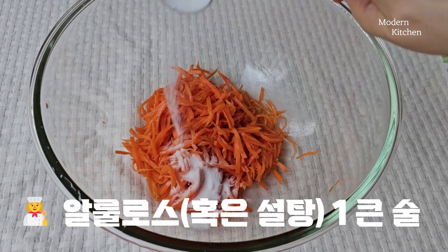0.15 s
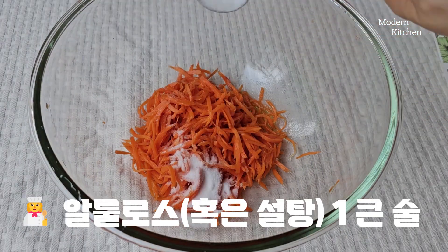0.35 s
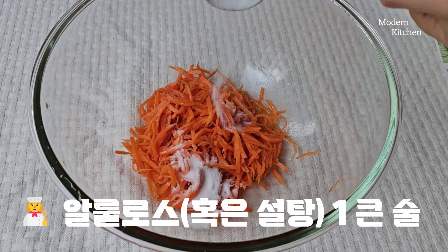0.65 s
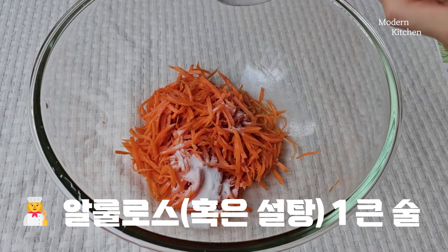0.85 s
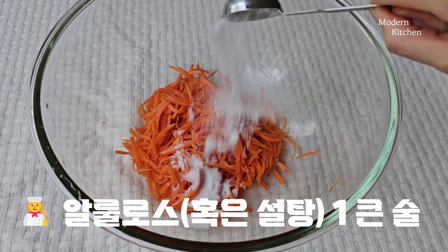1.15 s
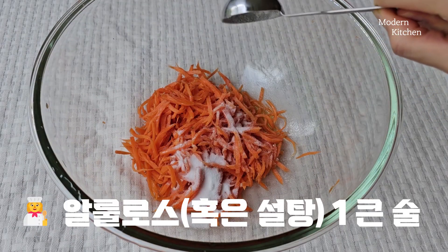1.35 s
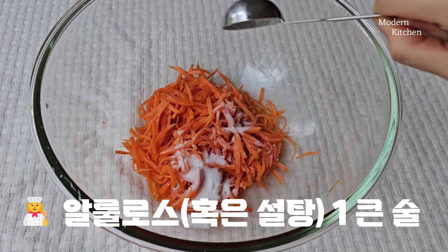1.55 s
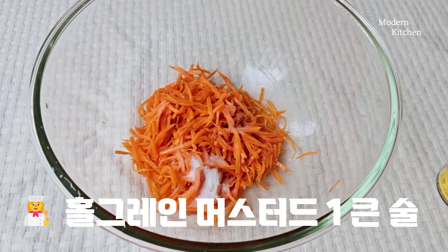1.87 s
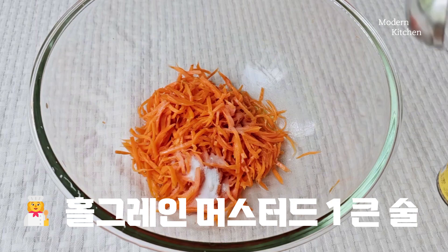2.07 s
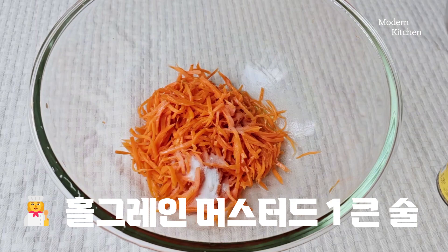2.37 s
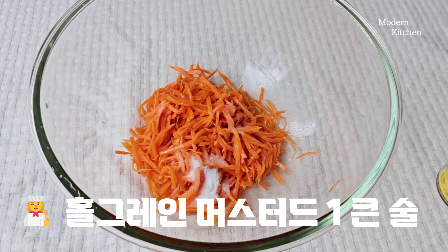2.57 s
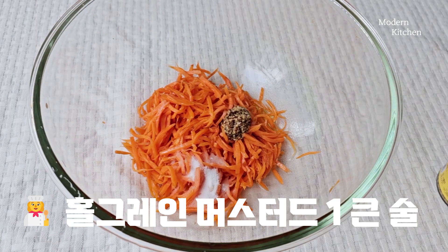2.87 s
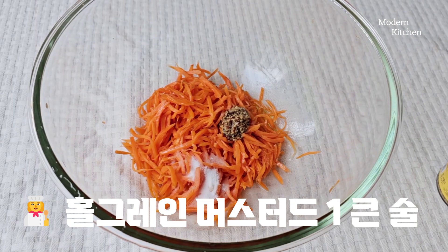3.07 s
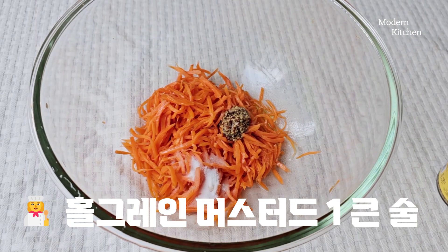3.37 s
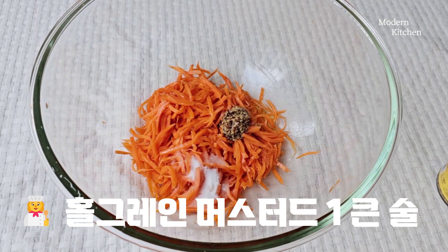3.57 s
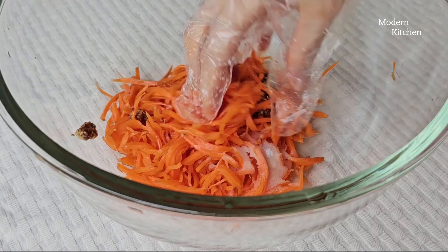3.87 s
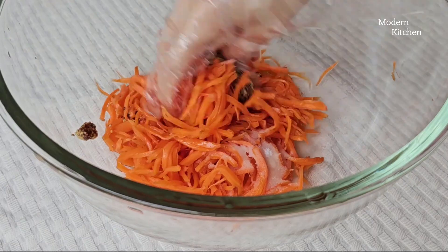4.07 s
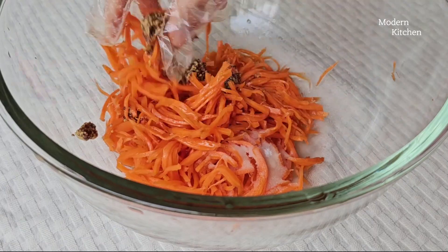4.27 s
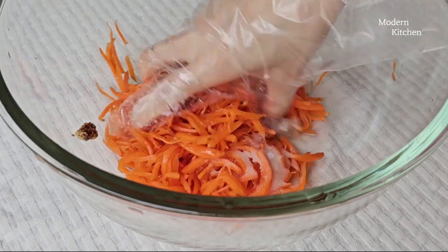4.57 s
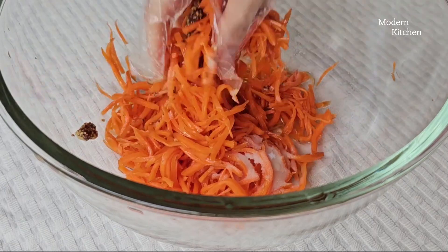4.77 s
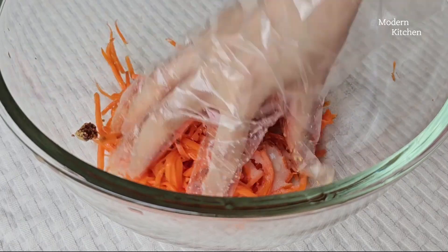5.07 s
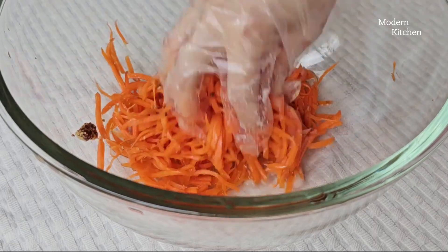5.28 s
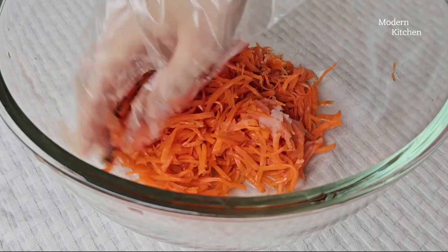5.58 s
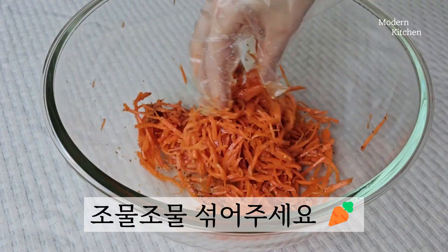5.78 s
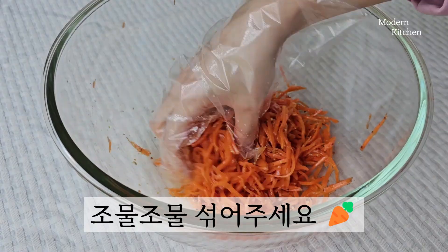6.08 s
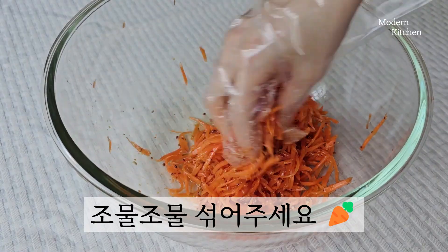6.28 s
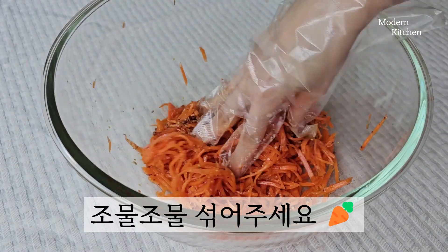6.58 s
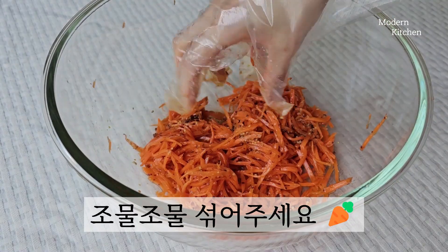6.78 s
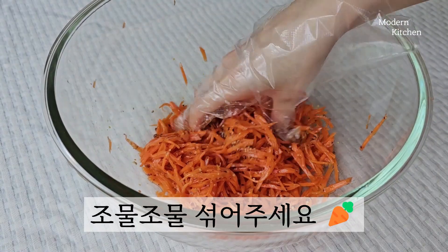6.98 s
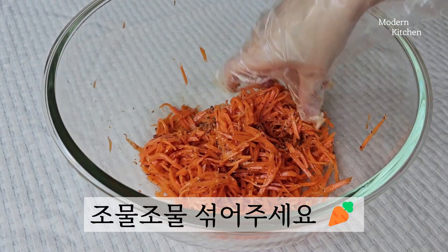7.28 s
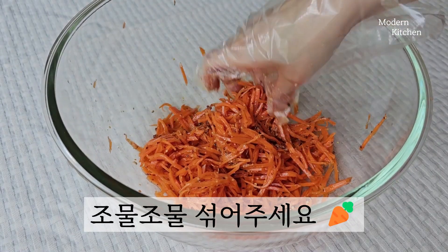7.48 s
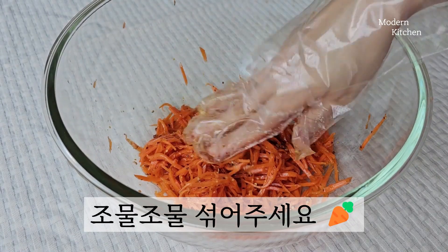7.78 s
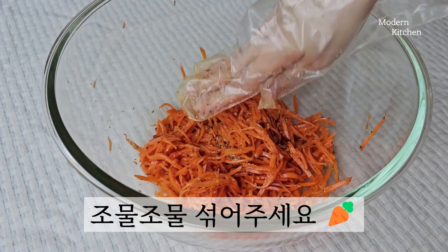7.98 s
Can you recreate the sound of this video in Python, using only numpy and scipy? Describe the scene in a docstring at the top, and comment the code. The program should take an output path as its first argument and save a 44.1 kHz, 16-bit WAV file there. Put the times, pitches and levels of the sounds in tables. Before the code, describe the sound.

A quiet kitchen, closely miked in stereo, with faint low hum, table rumble and soft hiss. At about 1.0 to 1.3 s fingers lightly tap a steel measuring spoon, small dry clicks with a trace of rattling sugar; fainter ones follow to 1.7 s. The level dips briefly near 1.8 s. Another spoon gives thin bright ticks at 2.15 and 2.3 s, and a weaker one at 2.7 s. A lump of mustard lands very softly at 3.0 s, then a loud, sharp clink rings high at 3.4 s. After a tiny gap near 3.8 s, a hand in thin plastic film squeezes carrot shreds in a glass bowl until 8.1 s: dense, bright crackle in irregular surges, strongest snaps around 4.0 s, moist low squelch underneath, and dull bumps and table booms, notably at 4.55, 5.2 and 6.95 s. The sound leans slightly left, with little room reverberation.

```python
"""Faint hum and hiss come first, then finger taps on a steel measuring spoon; a second spoon ticks on a jar
and drops mustard. A hand in a thin plastic glove then squeezes shredded carrot in a glass bowl.
Film and wet shreds are crowds of short wavelets, the mustard spoon is a sum of decaying modes, taps are
noise through the spoon's resonances, and the table boom is low noise that swells with pressure.
The whole level dips briefly near 1.8 s and 3.8 s."""
import sys
import numpy as np
from scipy import signal
from scipy.fft import rfft, irfft, next_fast_len
from scipy.io import wavfile
from scipy.ndimage import uniform_filter1d, map_coordinates

SR = 44100
rng = np.random.default_rng(int(sys.argv[2]) if len(sys.argv) > 2 else 0)


def transcribe(signal):
    """Save signal, clipped to [-1, 1], as a 16-bit WAV file at the path in sys.argv[1]."""
    frames = np.atleast_2d(signal).T
    limited = np.clip(frames, -1, 1)
    pcm = np.round(limited * 32767).astype(np.int16)
    wavfile.write(sys.argv[1], SR, pcm)


N = 358974

# Squeezing hand: t/s, crackle level/dB, squelch over crackle/dB, treble over crackle/dB
SQUEEZES = [(3.8, -52.5, -7, -10), (3.82, -53, -12.5, -7), (3.9, -54.5, -3, -9), (3.93, -47, -12, -6),
            (4.13, -40, -9.5, -6), (4.31, -55, -11.5, -9), (4.42, -52, -10.5, -4), (4.44, -42, -19, -6),
            (4.56, -49, -4, -7.5), (4.58, -43, -14, -4), (4.65, -48.5, -15.5, -6), (4.67, -39.5, -12, -7),
            (4.72, -46.5, -10.5, -5.5), (5.01, -56, -14, -7), (5.02, -48.5, -15, -5.5),
            (5.21, -46, -8.5, -5.5), (5.24, -42, -13.5, -6), (5.37, -53, -13, -4), (5.39, -48, -11, -5),
            (5.53, -52, -16, -5), (5.54, -56.5, -10, -9), (5.59, -41, -19, -12), (5.62, -46.5, -12, -13),
            (5.65, -41, -13.5, -6.5), (5.87, -62, -12, -6.5), (5.94, -51.5, -13, -5), (5.96, -40, -18, -6),
            (5.98, -48, -17, -12), (6.13, -50.5, -10, -10.5), (6.17, -47, -10.5, -3),
            (6.28, -54, -12.5, -5.5), (6.45, -50.5, -11.5, -8), (6.58, -44.5, -14.5, -4.5),
            (6.66, -60.5, -11, -8), (6.7, -48, -16, -5), (6.75, -53, -10.5, -7.5), (6.87, -46.5, -11, -5.5),
            (6.91, -59, -5, -10), (6.94, -40.5, -14, -6.5), (7.04, -46, -10.5, -7), (7.29, -56, -12, -4.5),
            (7.35, -43, -14.5, -8), (7.37, -53, -13, -7), (7.41, -45, -13.5, -5), (7.47, -55.5, -14.5, -9),
            (7.68, -60.5, -10, -6), (7.76, -47, -11.5, -9), (7.8, -52, -8, -11), (7.82, -43, -19, -8),
            (7.84, -42.5, -8, -7), (7.95, -53.5, -9, -9), (7.96, -47, -16.5, -5), (8.04, -65, -6, -9),
            (8.14, -56, -9.5, -8)]
# Loudest film buckles: t/s of the first give, peak level/dB, f/Hz
LOUD_SNAPS = [(3.8219, -35.5, 8350), (3.9077, -36, 4600), (3.9276, -33, 5440), (3.9416, -30, 3700),
              (3.9564, -24.5, 5570), (3.992, -29, 7380), (4.0414, -25.5, 7500), (4.1885, -32, 7260),
              (4.2783, -31, 8170), (4.386, -37, 7290), (4.433, -35, 5490), (4.439, -32, 7290),
              (4.4716, -35, 4450), (4.5407, -35, 7530), (4.5737, -30, 8770), (4.656, -32, 6200),
              (4.6662, -29, 7450), (4.7296, -33, 7240), (4.756, -34, 4800), (4.8979, -31.5, 7150),
              (4.9204, -45, 3570), (4.9348, -36, 6470), (5.0171, -34, 8800), (5.2391, -29, 7090),
              (5.282, -29, 7500), (5.3364, -29, 13700), (5.5025, -31.5, 8210), (5.5619, -34, 4270),
              (5.5799, -26, 5150), (5.6697, -30, 7330), (5.7227, -32, 4760), (5.7799, -35, 8800),
              (5.9041, -34.5, 7350), (5.9313, -31, 7800), (5.9605, -27, 7100), (5.9926, -35, 2750),
              (6.0762, -33.5, 7560), (6.1715, -32.5, 7600), (6.2374, -35, 7080), (6.2997, -34, 11000),
              (6.395, -30.5, 5450), (6.4344, -38, 6160), (6.4755, -29.5, 7670), (6.5083, -31, 8200),
              (6.5287, -34, 7310), (6.6898, -38, 7280), (6.702, -33, 4750), (6.7223, -31, 7670),
              (6.7786, -32.5, 7410), (6.8195, -30.5, 7120), (6.922, -31, 5430), (6.938, -27, 4470),
              (7.022, -33, 7040), (7.113, -34, 6580), (7.1264, -32, 7330), (7.2166, -33, 13200),
              (7.3473, -27, 7360), (7.3878, -31, 5500), (7.4135, -27.5, 7090), (7.5614, -38.5, 2600),
              (7.5776, -32.5, 7700), (7.6277, -35, 8930), (7.7516, -31, 4430), (7.8183, -31, 6600),
              (7.956, -31, 5360), (8.1176, -39, 4450)]
# Spectrum of the film: f/Hz, density level/dB
FILM_SPECTRUM = [(710, -25), (1200, -11.5), (2150, -9.5), (2600, -4), (4430, -0.5), (6300, -2), (7350, 0.5),
                 (10000, -5.5), (11500, -3.5), (14500, -8.5), (16000, -8.5)]
# Spectrum of the wet shreds: f/Hz, density level/dB
SHRED_SPECTRUM = [(150, -15), (300, -11.5), (700, -21.5), (1500, -7), (2500, -16), (5000, -17)]
# Air and glass resonances of the bowl: f/Hz, width/Hz, level/dB
BOWL_MODES = [(595, 116, 4.5), (1039, 87, 10), (2163, 176, -5)]
# Shadow of the microphone body: f/Hz, left-right level/dB
BODY_SHADOW = [(300, -4), (700, 0), (1500, -1.5), (5000, 2.5), (15000, 0)]
# Mustard spoon on steel or glass: t/s, peak level/dB, left-right level/dB, ring level/dB,
# brightness/(dB per octave), crack t60/s
SPOON_TICKS = [(2.146, -32.5, 4, -45, 9.5, 0.019), (2.2796, -35.5, 2.5, -48, 8, 0.029),
               (2.715, -43, 12, -38, 23, 0.0064), (3.3746, -19.5, 1.5, -21.5, 2.5, 0.032)]
# Modes of the mustard spoon: f/Hz, level/dB, t60/s, swell/s
SPOON_MODES = [(1600, -15, .09, .001), (2552, -11, .45, .03), (4285, -19, .38, .002), (6207, -17, .1, .001),
               (7197, -13, .1, .001), (8759, -10, .4, .002), (10830, -16, .15, .001), (12550, 3, .24, .002),
               (14450, -14, .15, .001)]
# Finger taps on the sugar spoon: t/s, peak level/dB, left-right level/dB
FINGER_TAPS = [(1.0081, -52, 4), (1.0997, -36.5, 0), (1.2037, -39.5, 2), (1.3029, -54, 7), (1.51, -63, 9),
               (1.6132, -58, 10), (1.726, -57.5, 3.5)]
# Resonances of the sugar spoon's cup: f/Hz, width/Hz, level/dB
CUP_MODES = [(5170, 820, -11), (6400, 410, 6.5), (8700, 1300, -11), (11800, 2400, -14), (15000, 1900, -19)]
# Mustard or hand bumping the bowl: t/s, peak level/dB, f/Hz, t60/s, knock level/dB
BOWL_BUMPS = [(2.99, -54.5, 58, 0.3, -22), (4.1, -56, 279, 0.12, -12), (4.552, -46, 54, 0.11, -12),
              (5.158, -37, 195, 0.1, -4), (5.598, -54, 93, 0.16, -5), (5.963, -51.5, 83, 0.14, -1.5),
              (6.94, -44, 93.7, 0.22, 0)]
# Lump of mustard landing on the shreds: t/s of the peak, level/dB, rise/s and fall/s for 20 dB
MUSTARD_PLOP = (3, -61.5, 0.04, 0.07)
# Spectrum of the landing: f/Hz, density level/dB
PLOP_SPECTRUM = [(410, -57), (700, -34), (1090, 0), (1550, -17), (2480, -9), (3720, -12), (7130, -4.5),
                 (11300, -7), (15800, -16)]
# Handling of spoons and sliding sugar: t/s of the peak, dull level/dB, bright level/dB,
# rise/s and fall/s for 20 dB
HANDLING = [(1.01, -79, -92, .05, 0.4), (1.13, -83, -73, .06, 0.16), (1.31, -80.5, -71, 0.056, 0.1),
            (1.62, -80, -88, 0.11, 0.07), (1.7, -82, -83, 0.091, .12), (1.86, -85, -69.5, 0.19, 0.1),
            (2.05, -92, -68, 0.085, 0.08), (2.1, -86, -75, .04, .04), (2.17, -70.5, -62, 0.033, 0.1),
            (2.295, -71.5, -68, 0.027, 0.08), (2.41, -80, -78, .08, 0.3), (3.29, -77, -73, 0.077, .2),
            (3.35, -78, -76, .05, 0.15), (3.385, -54, -53, .012, 0.09), (3.72, -75, -75, .06, .14)]
# Resonances that colour the rubbing: f/Hz, width/Hz, level/dB
RUB_MODES = [(4400, 230, -12.5), (6400, 820, -10.5), (8750, 190, -4), (10020, 190, -6), (11500, 510, -10),
             (14500, 950, -10.5)]
# Hand leaning on the bowl: t/s of the peak, boom level/dB
LEANS = [(4.05, -61), (4.57, -50), (4.69, -54.5), (4.93, -60), (5.18, -49), (5.61, -62), (6.0, -61),
         (6.12, -56), (6.5, -63), (6.63, -65), (6.97, -51), (7.64, -69)]
# Boom of the table at rest: t/s, level/dB
TABLE_LEVEL = [(0, -69.5), (1.4, -71), (2.16, -77), (3.7, -74.5), (3.85, -66.5), (6.2, -68), (8.14, -73)]
# Spectrum of the table boom: f/Hz, density level/dB
TABLE_SPECTRUM = [(25, -11), (45, -9.5), (60, 3.5), (85, -7), (120, -10.5), (200, -42.5)]
# Deepest rumble: t/s, level/dB
DEEP_LEVEL = [(0, -69), (1.7, -67.5), (2.2, -84), (2.8, -82), (3.04, -69), (3.3, -82), (3.85, -72),
              (6.0, -77), (7.15, -71), (8.14, -75)]
# Spectrum of the deepest rumble: f/Hz, density level/dB
DEEP_SPECTRUM = [(10, -15), (22, 1), (40, 9), (60, -13), (90, -47.5)]
# Spectrum of the room hum: f/Hz, density level/dB
HUM_SPECTRUM = [(53, -24), (90, -3.5), (103, -13.5), (140, -14), (236, -4.5), (327, -11.5), (364, -6.5),
                (429, -17.5), (551, -15), (900, -26.5), (1170, -48), (1980, -120)]
# Room hum: t/s, level/dB
HUM_LEVEL = [(0, -75), (3.26, -78), (3.9, -74.5), (6.9, -72), (8.14, -76.5)]
# Spectrum of the hiss: f/Hz, density level/dB
HISS_SPECTRUM = [(410, -46), (700, -12), (983, -6.5), (1420, -6.5), (1860, -9.5), (2120, -1), (2420, -16.5),
                 (2860, -0.5), (3570, -3.5), (5940, -13), (7810, -12), (9380, -34), (11600, -10.5),
                 (15800, -14.5)]
# Hiss: t/s, level/dB
HISS_LEVEL = [(0, -74.5), (.4, -78), (1.7, -77), (2.6, -79.5), (8.14, -75)]
# Left-right likeness of hum and hiss: f/Hz, correlation (-1 to 1)
LIKENESS = [(60, 0.94), (180, 0.67), (550, 0.17), (1650, -0.16), (4970, -0.12), (15000, 0.52)]
# Reverberation of the kitchen: f/Hz, t60/s
REVERBERATION = [(300, 0.27), (3000, 0.58), (14000, 0.1)]
# Brief level dips: t/s of fall start, lowest from, lowest to and full return, lowest level/dB
LEVEL_DIPS = [(1.762, 1.776, 1.796, 1.803, -20), (3.764, 3.774, 3.796, 3.799, -60)]

TOP_HZ = 15900  # band limit
# left-right level of the film, its usual tilt, tilt per dB of extra treble, crackle at a firm squeeze
HAND_PAN_DB, DULL_DB, BRIGHTENS, FIRM_DB = 3.3, -0.7, 0.66, -47
# time for 20 dB; share in the deepest rumble
PRESS_RISE_S, PRESS_FALL_S, PRESS_DEEP_DB = 0.054, 0.083, -20
BUCKLE_S = .0012  # from the first give to the peak
# lesser buckles: level at a firm squeeze, dB per dB of crackle, middle pitch
LESSER_DB, LESSER_GROWS, LESSER_HZ = -38.5, 0.66, 7000
# snaps lie left; between squeezes the fine crackle sinks faster than the snaps
SNAP_PAN_DB, LULLS_DEEPEN = 5, 0.078


def glove():
    """Buckling instability: folds of film snap in clumps, as a crowd of clicks, a finer hiss and loud snaps."""
    crackle_db, _, treble_db = curves(SQUEEZES)
    squeezing = during(SQUEEZES)
    bright = DULL_DB + BRIGHTENS * (treble_db - treble_db[squeezing].mean())
    crowd = swarm(790, 20200, tail_db=3.5, cycles=0.44, count=17000, size=64)
    crowd = scatter(crowd * amp(2.8 * wobble(70)), t60=0.013, db=0)
    crowd = filtered(crowd, lambda hz: amp(along(FILM_SPECTRUM, hz)))
    crowd = crowd / np.sqrt(np.mean(crowd[:, squeezing] ** 2))
    fine_hiss = rush(FILM_SPECTRUM, [(1000, 0.39), (12000, 0.99)]) * squeezing
    bed = patchy(amp(0.07) * crowd + amp(-6.5) * fine_hiss, db=2.0)
    bed = tilted(bed, bright, hz=6540)

    s, db, hz = buckles(crackle_db, count=130)
    pan = SNAP_PAN_DB + 4 * rng.standard_normal(len(s))
    lead = 0.00014 + .8e-4 * rng.standard_normal(len(s))
    s = s + BUCKLE_S
    snaps = grains(s, hz, amp(db - 4.5), 0.69, pan, lead, size=128)
    # the broad edge of the buckle
    snaps += grains(s, 0 * s + 11000, amp(db - 1.0), 0.43, pan, lead, size=32)

    fine_db = crackle_db + LULLS_DEEPEN * np.minimum(crackle_db - FIRM_DB, 0)
    fine = amp(fine_db) * sides(HAND_PAN_DB)[:, None] * bed
    return fine + scatter(snaps, t60=0.014, db=3)


def buckles(crackle_db, count):
    """Stochastic events: the listed snaps, plus lesser ones at random times whose level grows with the crackle."""
    g = rng.standard_normal((count, 2))
    s = rng.uniform(SQUEEZES[0][0], SQUEEZES[-1][0] - .02, count)
    extra_db = crackle_db[(s * SR).astype(int)] - FIRM_DB
    db = LESSER_DB + LESSER_GROWS * extra_db + 3.6 * g[:, 0]
    hz = np.clip(LESSER_HZ * np.exp(.4 * g[:, 1]), 2500, 15000)
    return np.hstack([np.transpose(LOUD_SNAPS), [s, db, hz]])


def carrot():
    """Resonant colouring: the squelch of wet shreds is a crowd of low grains filtered by the bowl's modes."""
    squelch_db = sum(curves(SQUEEZES)[:2])
    wet = swarm(202, 4160, tail_db=2.5, cycles=0.44, count=9000, size=160)
    wet = wet * amp(1.55 * wobble(35))
    bowl = resonant(BOWL_MODES)
    wet = filtered(wet, lambda hz: amp(along(SHRED_SPECTRUM, hz) + 9) * (0.41 + bowl(hz)))
    wet = scatter(wet, t60=0.081, db=-8.5)
    wet = wet / np.sqrt(np.mean(wet[:, during(SQUEEZES)] ** 2))
    return amp(squelch_db + 4.5) * sides(3.4)[:, None] * wet


def mustard_spoon():
    """Modal vibration: a bright noise crack and the spoon's decaying modes, with levels differing by port."""
    out, t = np.zeros((2, N + SR)), np.arange(SR * 2 // 5) / SR
    f = np.fft.rfftfreq(len(t), 1 / SR)
    # the crack already leans on the modes
    body = .5 + 1.56 * resonant([(hz, 500, -3) for hz, *_ in SPOON_MODES])(f)
    low_cut = 1 + (1900 / (f + 1)) ** 3
    for s, db, pan, ring_db, bright, crack_s in SPOON_TICKS:
        ring = 0
        for hz, level, t60, swell in SPOON_MODES:
            decay = amp(level + rng.normal(0, 3.1, (2, 1)) - 60 * t / t60)
            onset = 1 - np.exp(-(t / swell) ** 2)
            turns = hz * t + [[0], [rng.normal(0, 0.22)]]  # random phase step at the right port
            ring = ring + decay * onset * np.sin(2 * np.pi * turns)
        crack = rng.standard_normal(len(t)) + 0.19 * rng.standard_normal((2, len(t)))
        crack *= amp(-60 * t / crack_s) * (1 - np.exp(-(t / .0011) ** 2))
        colour = body * amp(bright * np.log2(f / 9000 + 0.0078)) / low_cut
        crack = irfft(rfft(crack) * colour, len(t))
        tick = amp(db) * sides(pan)[:, None] * (amp(-3) * crack + amp(ring_db) * ring)
        out[:, round(s * SR):][:, :len(t)] += tick
    return out[:, :N]


def sugar_spoon():
    """Forced resonance: each tap's click and longer rattle of shaken crystals excite the modes of the cup."""
    out, t = np.zeros((2, N + SR)), np.arange(SR // 4) / SR
    for s, db, pan in FINGER_TAPS:
        onset = 1 - np.exp(-(t / 0.00053) ** 2)
        click = rng.standard_normal(len(t)) * amp(-60 * t / 0.013) * onset
        rattle = rng.standard_normal((2, len(t)))
        rattle *= amp(-18.5 - 60 * t / 0.26 + 3.7 * rng.standard_normal(len(t)))
        out[:, round(s * SR):][:, :len(t)] += amp(db + 7.5) * sides(pan)[:, None] * (click + rattle)
    return filtered(out[:, :N], resonant(CUP_MODES))


def bumps():
    """Damped oscillation: a soft push on the bowl gives a few dull cycles and a low noise knock."""
    out, t = np.zeros(N + SR), np.arange(SR // 3) / SR
    knocks = np.zeros(N + SR)
    for s, db, hz, t60, knock_db in BOWL_BUMPS:
        swell = amp(db + 2.0 - 60 * t / t60) * (1 - np.exp(-t / 0.0043))
        start = round(s * SR)
        out[start:][:len(t)] += swell * np.sin(2 * np.pi * hz * t)
        knocks[start:][:len(t)] += swell * amp(knock_db + 20) * rng.standard_normal(len(t))
    dull = lambda f: 1 / (1 + 1j * f / 200) ** 1.35
    return (out[:N] + filtered(knocks[:N], dull)) * sides(1.7)[:, None]


def plop():
    """Granular impact: the lump of mustard gives a short wet scatter of seeds, as fast-fluctuating noise."""
    grainy = swells(*MUSTARD_PLOP) * amp(3 * wobble(400))
    return grainy * rush(PLOP_SPECTRUM, [(1000, 0.25)]) * sides(7.9)[:, None]


def rustle():
    """Friction noise: a faint grainy rubbing excites the spoons' resonances; dull and bright shares swell apart."""
    s, dull_db, bright_db, rise_s, fall_s = np.transpose(HANDLING)
    rub = rush([(2000, -23), (3500, -2.0), (16000, 2.5)], [(1000, 0.75)])
    rub = rub * amp(2.6 * wobble(90))
    spoons = resonant(RUB_MODES)
    rub = filtered(patchy(rub, db=4), lambda hz: 0.14 + spoons(hz))
    low = filtered(rub, lambda hz: 1 / (1 + (hz / 7500) ** 6))
    dull = swells(s, dull_db, rise_s, fall_s) * unit(low)
    return dull + swells(s, bright_db, rise_s, fall_s) * unit(rub - low)


def table_boom():
    """Structure-borne sound: low noise comes up through the table, swelling as the hand leans on the bowl."""
    press = swells(*np.transpose(LEANS), PRESS_RISE_S, PRESS_FALL_S)
    boom_gain = amp(curves(TABLE_LEVEL)[0] + 2.4 * wobble(14)) + press
    boom = boom_gain * rush(TABLE_SPECTRUM, [(60, 0.86)])
    deep_gain = amp(curves(DEEP_LEVEL)[0] + 2.3 * wobble(4)) + amp(PRESS_DEEP_DB) * press
    return boom + deep_gain * rush(DEEP_SPECTRUM, [(30, .85)])


def room_tone():
    """Stationary noise: appliances, far traffic and microphone hiss, as shaped noise at slowly varying levels."""
    hum_gain = amp(curves(HUM_LEVEL)[0] + 2.0 + 0.33 * wobble(5))
    hum = hum_gain * rush(HUM_SPECTRUM + [(1400, -72)], LIKENESS)
    hiss = amp(curves(HISS_LEVEL)[0]) * patchy(rush(HISS_SPECTRUM, LIKENESS), db=1.0)
    return hum + hiss


def kitchen(x):
    """Reverberation: a noise tail in which each frequency of the room's answer dies at its own speed."""
    hz, t, z = signal.stft(rng.standard_normal((2, SR // 2)), SR, nperseg=256)
    decay = amp(-60 * t / along(REVERBERATION, hz)[:, None])
    tail = signal.istft(z * decay, SR, nperseg=256)[1]
    delayed = np.pad(x, ((0, 0), (300, 0)))
    return signal.fftconvolve(delayed, tail / np.linalg.norm(tail[0]), axes=1)[:, :N]


def swarm(lo_hz, hi_hz, tail_db, cycles, count, size):
    """Superposition: a flat-spectrum crowd of grains at random times and positions, few of them large."""
    u = rng.random((count, 3))
    g = rng.standard_normal((count, 2))
    hz = lo_hz + (hi_hz - lo_hz) * u[:, 1]
    gain = np.sqrt(hz) * amp(-tail_db * np.log(u[:, 2] + 0.0063))
    s = SQUEEZES[0][0] + (SQUEEZES[-1][0] - SQUEEZES[0][0]) * u[:, 0]
    return grains(s, hz, gain, cycles, 6.7 * g[:, 0], 0.00013 + .8e-4 * g[:, 1], size=size)


def grains(s, hz, gain, cycles, pan_db, lead_s, size):
    """Interaural cues: wavelets with envelope peaks near s reach the left port lead_s before the right."""
    out = []
    for side, level in zip((-.5, .5), sides(pan_db)):
        at = (s + side * lead_s - cycles / hz) * SR
        first = np.ceil(at).astype(int)
        index = first[:, None] + np.arange(size)
        turns = ((first - at)[:, None] + np.arange(size)) / SR * hz[:, None]
        envelope = turns / cycles * np.exp(1 - turns / cycles)
        wave = (gain * level)[:, None] * np.sin(2 * np.pi * turns) * envelope
        out.append(np.bincount(index.ravel(), wave.ravel(), N + size + 99)[:N])
    return np.array(out)


def scatter(x, t60, db, count=8):
    """Near reflections: x plus a dense tail that differs at each port and switches at random between poses."""
    t = np.arange(SR // 25) / SR
    pose = np.repeat(rng.integers(count, size=N // 1024 + 1), 1024)[:N]
    tails = rng.standard_normal((count, 2, len(t))) * amp(-60 * t / t60)
    tails /= np.linalg.norm(tails, axis=2, keepdims=True)
    echoes = sum(signal.oaconvolve(x * (pose == k), tail, axes=1)[:, :N] for k, tail in enumerate(tails))
    return x + amp(db) * echoes


def tilted(x, bright, hz):
    """Spectral balance: a dull and a bright share of x, weighed against each other."""
    low = filtered(x, lambda f: 1 / (1 + (f / hz) ** 3))
    return amp(-bright) * low + amp(bright) * (x - low)


def patchy(x, db):
    """Time-frequency modulation: smooth random gain patches vary the colour from moment to moment."""
    z = signal.stft(x, nperseg=256)[2]
    field = uniform_filter1d(rng.standard_normal(z.shape[1:]), size=7, axis=0)
    field = uniform_filter1d(field, size=12, axis=1)
    return signal.istft(z * amp(db * unit(field)), nperseg=256)[1][:, :N]


def rush(spectrum, alike):
    """Partial coherence: stereo noise of rms 1 whose mid and side shares set the left-right likeness."""
    turn = lambda hz: np.arccos(np.clip(along(alike, hz), -1, 1)) / 2
    response = lambda hz: amp(along(spectrum, hz)) * [np.cos(turn(hz)), np.sin(turn(hz))]
    mid, side = filtered(rng.standard_normal((2, N)), response)
    return unit(np.array([mid + side, mid - side]))


def swells(s, db, rise_s, fall_s):
    """Exponential growth and decay: summed gains reach db at times s; rise and fall are times for 20 dB."""
    t = np.arange(0, N, 16) / SR
    s, db, rise_s, fall_s = (np.reshape(v, (-1, 1)) for v in (s, db, rise_s, fall_s))
    gain = amp(db - 20 * np.maximum((s - t) / rise_s, (t - s) / fall_s)).sum(axis=0)
    return np.interp(np.arange(N) / SR, t, gain)


def resonant(modes):
    """Damped resonators: causal response of modes with f/Hz, width/Hz, level/dB, alternating in sign."""
    def response(f):
        total = 0
        for k, (c, w, db) in enumerate(modes):
            total = total + (-1) ** k * amp(db) * 1j * f * w / (c * c - f * f + 1j * f * w)
        return total
    return response


def filtered(x, response):
    """Linear filtering: the spectrum of x times a complex response of frequency."""
    m = next_fast_len(N + SR // 2)
    return irfft(rfft(x, m) * response(np.fft.rfftfreq(m, 1 / SR)), m)[..., :N]


def wobble(rate):
    """Random modulation: a smooth random curve with rate knots a second."""
    return map_coordinates(rng.standard_normal(int(N * rate / SR) + 4), [np.arange(N) * rate / SR])


def curves(rows):
    """Linear interpolation in time: one value per sample for each column after t/s."""
    s, *cols = np.transpose(rows)
    return [np.interp(np.arange(N) / SR, s, c) for c in cols]


def during(rows):
    """Time gate: true while a curve table lasts and for 20 ms after."""
    t = np.arange(N) / SR
    return (t > rows[0][0]) & (t < rows[-1][0] + .02)


def along(points, hz):
    """Logarithmic frequency scale: (f/Hz, value) points interpolated on a log axis."""
    f, v = np.transpose(points)
    return np.interp(np.log(hz + 1), np.log(f + 1), v)


def sides(pan_db):
    """Level-difference stereo: left and right gains for a left-right level/dB."""
    return amp(np.array([pan_db, -pan_db]) / 2)


def unit(x):
    """Root-mean-square normalisation: x at rms 1."""
    return x / np.sqrt(np.mean(x ** 2) + 1e-20)


def amp(db):
    """Decibel law: amplitude ratio of a level/dB."""
    return 10 ** (np.asarray(db) / 20)


def scene():
    """Superposition: direct sources, the room's answer to hand and spoons, and the background."""
    hand = filtered(glove() + carrot(), lambda hz: sides(along(BODY_SHADOW, hz)))
    spoons = sugar_spoon() + mustard_spoon()
    room = kitchen(amp(-14.0) * hand + amp(-17) * spoons)
    return hand + spoons + room + bumps() + plop() + rustle() + table_boom() + room_tone()


def record(dry):
    """Gain envelope and band limitation: the level dips briefly twice; nothing above the limit is kept."""
    dips = np.array(LEVEL_DIPS)
    times = dips[:, :4].ravel()
    gains = amp(np.outer(dips[:, 4], [0, 1, 1, 0])).ravel()
    fade = np.interp(np.arange(N) / SR, times, gains)
    return filtered(dry * fade, lambda hz: hz < TOP_HZ)


dry = scene()
out = record(dry)
transcribe(out)
```